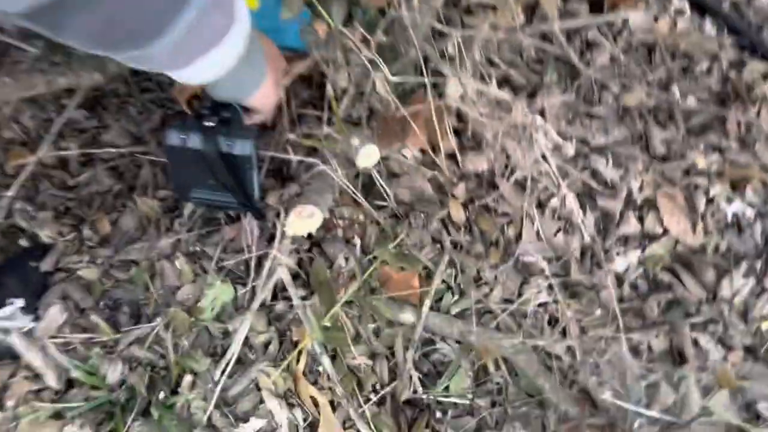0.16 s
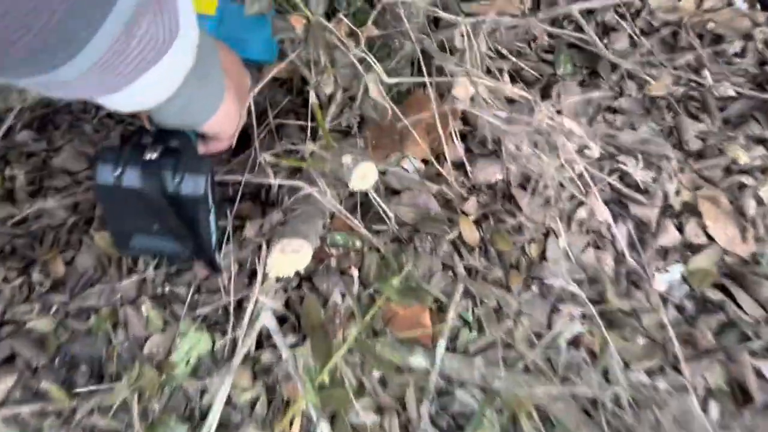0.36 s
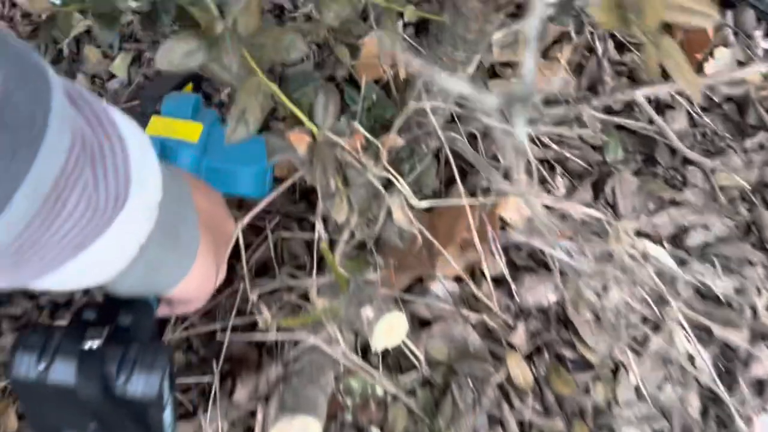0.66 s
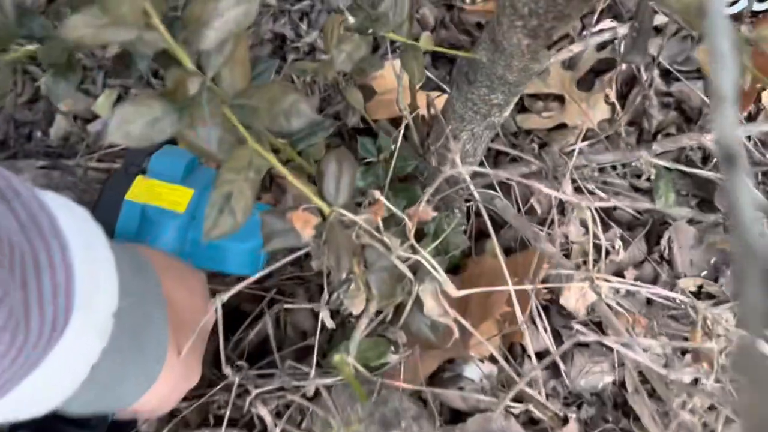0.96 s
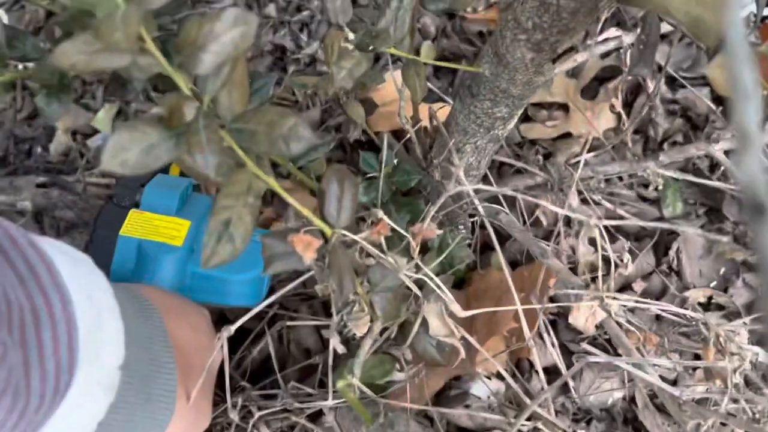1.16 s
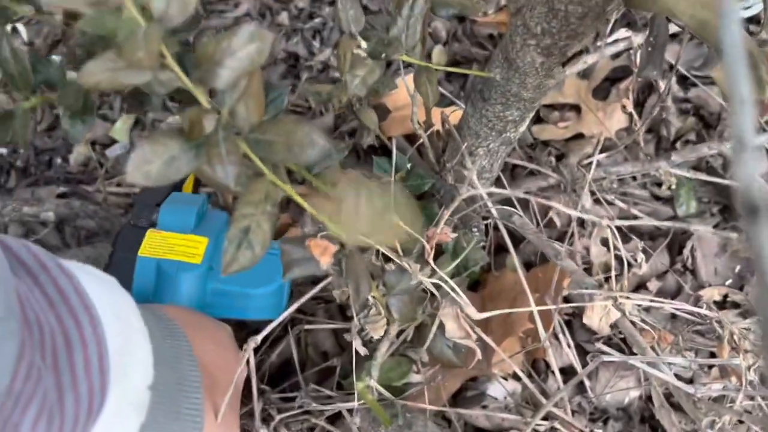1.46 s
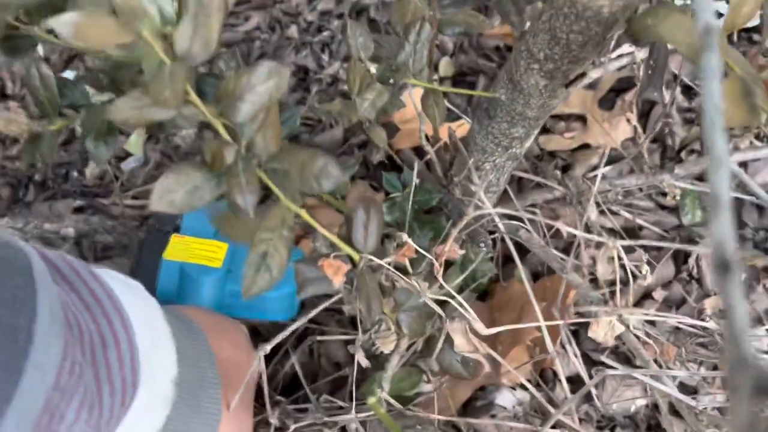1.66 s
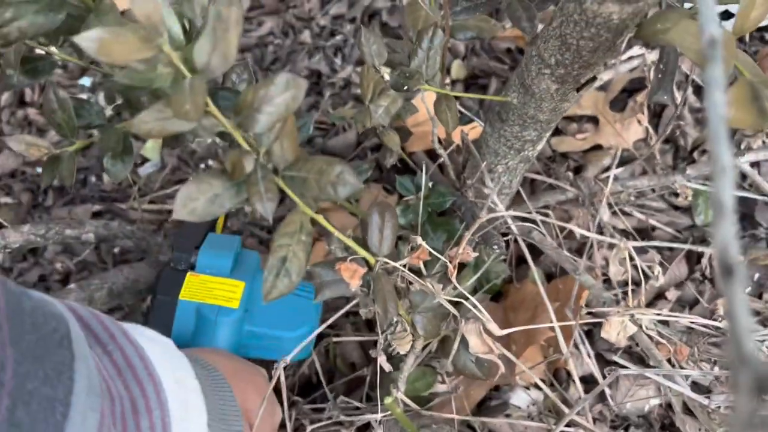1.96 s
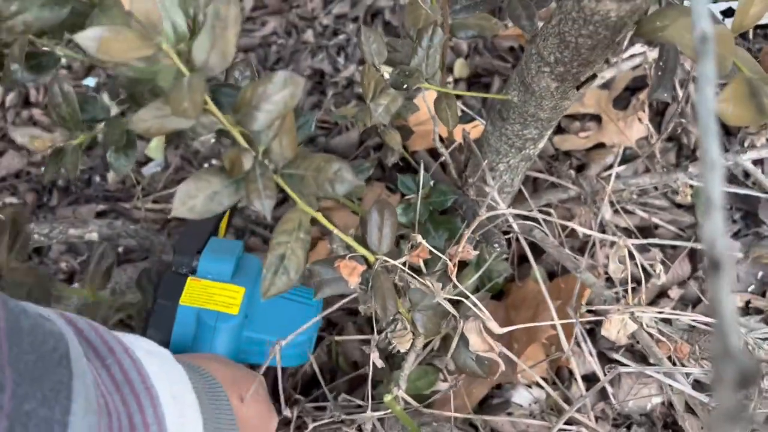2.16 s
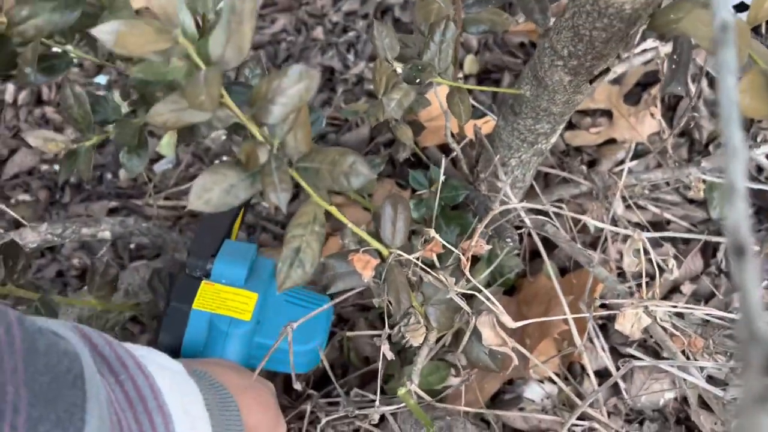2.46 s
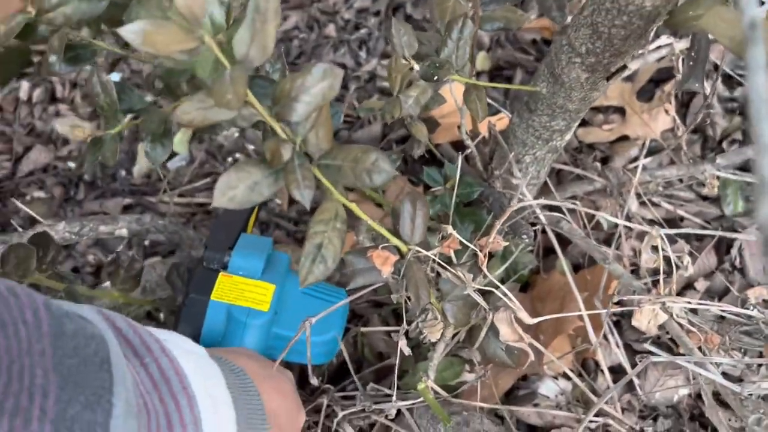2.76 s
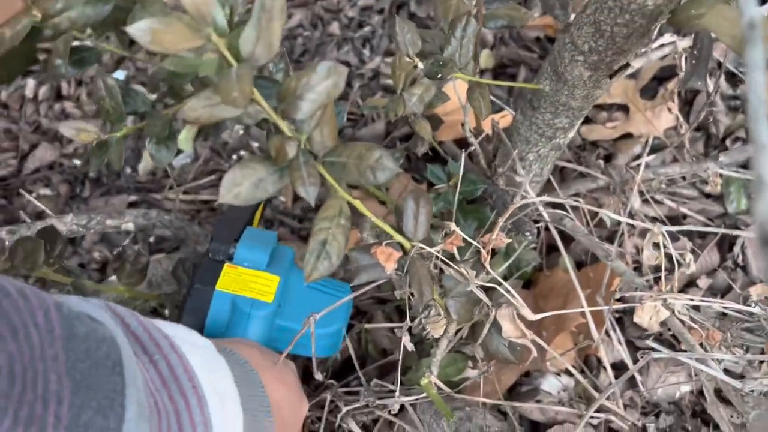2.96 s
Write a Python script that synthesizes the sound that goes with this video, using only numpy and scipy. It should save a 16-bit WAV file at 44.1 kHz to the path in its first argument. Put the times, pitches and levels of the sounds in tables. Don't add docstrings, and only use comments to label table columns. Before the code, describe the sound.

A small cordless chainsaw runs free with a steady whine and chain clatter, then bites a woody stem, chattering and tearing with sharp fibre snaps, before easing off while still running; outdoors, close phone microphone, faint wind.

```python
import sys
import numpy as np
from scipy import signal
from scipy.fft import rfft, irfft, next_fast_len
from scipy.io import wavfile
from scipy.ndimage import uniform_filter1d, map_coordinates

SR = 44100
rng = np.random.default_rng(int(sys.argv[2]) if len(sys.argv) > 2 else 0)


def ratio_of_db(decibels):
    return 10 ** (np.asarray(decibels, float) / 20)


def dump(signal):
    limited = np.clip(np.atleast_2d(signal).T, -1, 1)
    pcm = np.round(limited * 32767).astype(np.int16)
    wavfile.write(sys.argv[1], SR, pcm)


N = 136710
T = np.arange(N) / SR

# [t/s, level/dB]
CHAIN_LEVEL = [(0, -18), (.45, -16), (.6, -16.5), (.78, -16.5), (.95, -17), (1.35, -18.5), (1.6, -20),
               (1.9, -18.5), (2.27, -20.5), (2.33, -19), (2.75, -18.5), (3.1, -19)]
# [t/s, f/Hz]
SHAFT_SPEED = [(0, 464.8), (.47, 464.8), (.62, 456), (.7, 446), (.78, 424), (.9, 428), (1.1, 443),
               (1.42, 449), (1.62, 426), (1.93, 439), (2.18, 445), (2.275, 470), (2.3, 433), (2.5, 426),
               (2.79, 441.5), (2.9, 430.5), (3, 427.5), (3.1, 431)]
# [t/s, level/dB]
WHINE_LEVEL = [(0, -38), (.58, -35), (.78, -37), (.95, -31), (1.45, -31), (1.62, -37), (1.9, -37),
               (2.27, -33), (2.285, -60), (2.335, -60), (2.38, -37), (3.1, -36)]
# [f/Hz, width/Hz, level/dB]
BAR_FREE = [(830, 130, -0.5), (1128, 61, 6.5), (1645, 80, 8.5), (2210, 46, -18), (2640, 810, -3.5),
            (3030, 450, 0)]
# [f/Hz, width/Hz, level/dB]
BAR_TURNED = [(390, 37, -4.5), (544, 42, -32), (638, 12, 6.5), (1020, 14, 5), (1620, 67, -31),
              (2040, 125, 6), (2800, 1320, -1), (2910, 68, 8), (3770, 620, -19)]
# [f/Hz, width/Hz, level/dB]
HOUSING = [(4510, 230, -5), (5440, 160, 2), (6310, 880, 4), (8450, 920, 1), (11960, 860, 7.5),
           (14500, 1940, 6.5)]
# [f/Hz, level/dB]
HISS_FREE = [(180, -50), (300, -26), (545, -9.5), (1110, -12), (1630, -11.5), (1890, -1), (5740, -6.5),
             (12000, -10), (15800, -12)]
# [f/Hz, level/dB]
HISS_TURNED = [(150, -57), (250, -28), (413, -12), (1690, 1), (2080, 0), (6300, -3.5), (10600, -7.5),
               (12000, -6), (15800, -7.5)]
# [f/Hz, level/dB]
WIND_SPECTRUM = [(25, -32), (45, 0), (75, 8.5), (102, 9), (120, -5), (300, 0.5), (600, -52)]
# [t/s, level/dB]
WIND_LEVEL = [(0, -52.5), (.8, -46), (1.6, -48), (2.1, -55.5), (3.1, -59)]
# [t/s, tearing level/dB, stem thump level/dB]
BITE = [(0, -50, -70), (.4, -40, -70), (.5, -22, -55), (.62, -19, -46), (.69, -19, -35), (.82, -18, -32),
        (.95, -16, -35), (1.25, -18, -37), (1.45, -20, -37), (1.65, -22, -39), (1.85, -22, -39),
        (2.0, -23, -42), (2.15, -22, -45), (2.26, -24, -45), (2.3, -45, -64), (3.1, -45, -62)]
# [t/s, tearing level/dB, stem thump level/dB]
GRABS = [(0.469, -10, -47), (0.506, -14, -45), (0.528, -22, -42), (0.569, -23, -43), (0.598, -7, -43),
         (0.637, -13, -31), (0.683, -15, -34.0), (0.7, -14, -31), (0.734, -6, -21), (0.781, -9, -34),
         (0.855, -12, -40), (0.879, -22, -33.0), (0.896, -9.5, -20), (0.926, -17, -29.0), (0.955, -23, -30),
         (1.02, -12.1, -17), (1.036, -16, -31), (1.058, -12.5, -41), (1.083, -11, -29), (1.111, -22, -46),
         (1.151, -12.5, -44), (1.164, -14, -37), (1.228, -8, -23), (1.26, -9, -27), (1.286, -14.7, -30),
         (1.314, -15.5, -30), (1.328, -17.5, -20.5), (1.375, -11.5, -29), (1.391, -10, -29.0),
         (1.42, -7.5, -26), (1.453, -11, -23.5), (1.485, -14.9, -34.0), (1.523, -9, -24), (1.551, -20, -27),
         (1.586, -11, -32), (1.618, -8.5, -40), (1.635, -26, -39), (1.659, -20, -33), (1.678, -8.5, -24),
         (1.721, -8, -25.5), (1.762, -15.7, -30), (1.789, -7, -28), (1.818, -11, -22.5), (1.848, -22, -41),
         (1.875, -9, -31.0), (1.9, -10, -22), (1.918, -18.0, -30), (1.949, -14.5, -47), (1.986, -25, -41),
         (2.019, -20, -24), (2.073, -13.1, -28), (2.093, -18, -27), (2.142, -9.5, -25), (2.185, -20, -41),
         (2.203, -13, -25), (2.235, -30, -43.0), (2.259, -16, -37), (2.272, -22, -39.0)]
# [t/s, length/s, depth/dB]
LIFTS = [(0.762, 0.017, 10), (0.831, 0.026, 8.5), (0.877, 0.01, 4), (1.205, 0.024, 5.5), (1.276, 0.021, 3),
         (1.501, 0.012, 8), (1.537, 0.011, 7), (1.839, 0.016, 8), (1.92, 0.045, 2.5), (2.025, 0.01, 9.5),
         (2.286, .03, 1)]
# [f/Hz, level/dB]
KERF = [(120, -6), (200, -28.5), (2890, 0), (3340, -11.5), (5370, -8), (9820, -10), (14200, -11),
        (15800, -16)]
# [f/Hz, width/Hz, level/dB]
STEM = [(770, 200, -0.5), (1475, 205, 4), (3020, 600, 3), (5440, 1100, 7)]
# [f/Hz, width/Hz, level/dB]
KNOCK = [(777, 560, -5), (1610, 450, 1.5), (2400, 570, 1.5), (2915, 920, 3)]
# [f/Hz, level/dB]
THUMP = [(90, -28), (160, -7), (260, 2), (420, 6), (800, -28), (1500, -12)]
# [t/s, peak level/dB]
SNAPS = [(0.4684, -11), (0.5053, -1), (0.5916, -7), (0.5994, -7), (0.6172, 0), (0.6361, -7), (0.6821, -7),
         (0.713, -4), (0.725, -5), (0.7342, -2), (0.7806, -4), (0.7946, -8), (0.8041, -8), (0.853, -7),
         (0.8801, -8), (0.8929, -5), (0.9251, -6), (0.9379, -6), (0.9529, -7), (1.0207, -6), (1.0432, -13),
         (1.0584, -19), (1.0837, -1), (1.11, -8), (1.152, -3), (1.1616, -8), (1.1722, -8), (1.2194, -10),
         (1.234, -3), (1.2451, -6), (1.2529, -11), (1.259, -8), (1.3155, -3), (1.327, -5), (1.3747, -4),
         (1.3888, -6), (1.411, -12), (1.4195, -7), (1.451, -16), (1.486, -11), (1.516, -20), (1.6084, -10),
         (1.6747, 0), (1.6812, -6), (1.7198, -10), (1.7897, -5), (1.8185, -10), (1.875, -15), (1.8964, -12),
         (1.9503, -11), (1.9863, -13), (2.0655, -8), (2.074, -5), (2.092, -6), (2.1356, -9), (2.145, -12),
         (2.1734, -13), (2.234, -14)]
# [f/Hz, width/Hz, level/dB]
SNAP_RING = [(900, 700, -0.5), (1600, 530, 8), (2700, 1400, 8), (5500, 3000, -10)]

CHAIN_LINKS, LINKS_PER_TURN = 28, 1.1806


def unit(x):
    return x / np.sqrt(np.mean(x ** 2) + 1e-20)


def along(points, hz):
    f, db = np.transpose(points)
    return ratio_of_db(np.interp(np.log(hz + 1), np.log(f + 1), db, left=-120, right=-120))


def curves(rows):
    s, *columns = np.transpose(rows)
    return [np.interp(T, s, column) for column in columns]


def wobble(rate):
    return map_coordinates(rng.standard_normal(2000), [T * rate])


def filtered(x, response):
    size = next_fast_len(N + 8192)
    spectrum = rfft(x, size) * response(np.fft.rfftfreq(size, 1 / SR))
    return unit(irfft(spectrum, size)[:N])


def peaks(modes, f):
    total = 0
    for k, (centre, width, db) in enumerate(modes):
        damping = 1j * f * width
        total = total + (-1) ** k * ratio_of_db(db) * damping / (centre * centre - f * f + damping + 1e-9)
    return total


def humps(modes, f):
    return ratio_of_db(sum(db / (1 + (2 * (f - centre) / width) ** 2) for centre, width, db in modes))


def patchy(depth_db):
    z = signal.stft(rng.standard_normal(N + 512), nperseg=256)[2]
    field = uniform_filter1d(rng.standard_normal(z.shape), size=3, axis=0)
    field = uniform_filter1d(field, size=6, axis=1)
    return signal.istft(z * ratio_of_db(depth_db * unit(field)), nperseg=256)[1][:N]


def turned(pair):
    turn_s, turn_length_s = 1.4, 1.2
    share = np.clip((T - turn_s) / turn_length_s + .5, 0, 1)
    return pair[0] * (1 - share) + pair[1] * share


def bite_share():
    thump_db = curves(BITE)[1]
    return np.clip((thump_db + 55) / 12, 0, 1)


def lift_db():
    return -sum(db * np.exp(-(2 * (T - s) / width) ** 4) for s, width, db in LIFTS)


def lap(turns):
    first_pass_s, width_links = .0085, 1.7
    links = (turns - np.interp(first_pass_s, T, turns)) * LINKS_PER_TURN
    away = (links + CHAIN_LINKS / 2) % CHAIN_LINKS - CHAIN_LINKS / 2
    joint_db = turned((9, 2.5)) * (1 - 0.49 * bite_share())
    return links, ratio_of_db(joint_db * np.exp(-(away / width_links) ** 2 / 2))


def motor(turns, whine_db):
    bars = 12
    load = bite_share()
    shake = 2.2 * load

    def tone(order, db, roughness):
        phase = 2 * np.pi * order * turns + roughness * wobble(60)
        phase = phase + shake * (order / bars) ** 0.56 * wobble(150)
        return ratio_of_db(db + 0.44 * wobble(30.9)) * np.sqrt(2) * np.sin(phase)

    shaft = tone(0.99, turned((-43.5, -56)), 0.16)
    whine = tone(bars, whine_db, 0.083)
    mesh = tone(LINKS_PER_TURN, turned((-40, -50)), 0.05)
    octave = tone(2 * LINKS_PER_TURN, turned((-37.5, -38.5)) - 6.5 + 6 * load, 0.14)
    third = tone(3 * LINKS_PER_TURN, turned((-48, -54)) + 8.5, 0.081)
    return shaft + whine + mesh + lap(turns)[1] * (octave + third)


def chain(turns):
    links, joint = lap(turns)
    index = np.floor(4 * links).astype(int)
    hit = np.diff(index, prepend=index[0]) > 0
    pattern = rng.standard_normal(4 * CHAIN_LINKS)[index % (4 * CHAIN_LINKS)]
    size = pattern * ratio_of_db(1.5 * rng.standard_normal(N))
    strikes = unit(hit * size * joint ** .5)
    noise_share = turned((0.67, 0.65))
    drive = joint * (np.sqrt(1 - noise_share) * strikes + np.sqrt(noise_share) * patchy(depth_db=-1.0))
    clatter = turned([filtered(drive, lambda f: peaks(modes, f) * f / (f + 400))
                      for modes in (BAR_FREE, BAR_TURNED)])
    rush = joint ** 0.13 * patchy(depth_db=1.5)
    hiss = turned([filtered(rush, lambda f: along(spectrum, f) * humps(HOUSING, f))
                   for spectrum in (HISS_FREE, HISS_TURNED)])
    clatter_db = turned((-7, -7)) - 2.5 * bite_share()
    return ratio_of_db(clatter_db) * clatter + hiss


def wind():
    level_db = curves(WIND_LEVEL)[0]
    air = filtered(rng.standard_normal(N), lambda f: along(WIND_SPECTRUM, f))
    return ratio_of_db(level_db + 0.71 * wobble(4.2)) * air


def chip_ticks():
    chips_per_s, scatter_db = 900, 4
    chance = rng.random((N, 3))
    breaks = chance[:, 0] < chips_per_s / SR
    size = ratio_of_db(-scatter_db * np.log(chance[:, 2] + 0.016))
    return unit(breaks * np.sign(chance[:, 1] - .5) * size)


def grab_envelope(times, levels_db, half_s):
    return np.sqrt(sum(ratio_of_db(2 * db) * np.exp(-((T - s) / half_s) ** 2) for s, db in zip(times, levels_db)))


def cut():
    bite_db, thump_db = curves(BITE)
    grab_s, tear_db, lump_db = np.transpose(GRABS)
    grabs = grab_envelope(grab_s, tear_db, half_s=.004)
    lumps = grab_envelope(grab_s, lump_db, half_s=.007)
    force = ratio_of_db(lift_db() + 0.78 * wobble(45.7) + 1.93 * wobble(110))
    chips = chip_ticks()
    tear = filtered(patchy(depth_db=1.5), lambda f: along(KERF, f) * humps(STEM, f))
    ring = filtered(chips, lambda f: peaks(STEM[:3], f) / (1 + (f / 4500) ** 2))
    knock = filtered(grabs * (patchy(depth_db=3.5) + 0.69 * chips), lambda f: peaks(KNOCK, f))
    thump = filtered(chips + patchy(depth_db=1.0), lambda f: along(THUMP, f))
    wood = (ratio_of_db(bite_db - 1.5) + ratio_of_db(-16.5) * grabs) * (tear + ratio_of_db(-4.5) * ring)
    body = (ratio_of_db(thump_db - 4.5) + ratio_of_db(-11.5) * lumps) * thump
    return force * (wood + body) + ratio_of_db(-7.5) * np.std(grabs) * knock


def snaps():
    s, db = np.transpose(SNAPS)
    signs = np.sign(rng.random(len(s)) - .5)
    blows = np.bincount((s * SR).astype(int), ratio_of_db(db) * signs, N)
    ticks = filtered(blows, lambda f: peaks(SNAP_RING, f))
    return ratio_of_db(db.max() - 3) * ticks / np.abs(ticks).max()


def scene():
    hz, whine_db, level_db = (curves(rows)[0] for rows in (SHAFT_SPEED, WHINE_LEVEL, CHAIN_LEVEL))
    turns = np.cumsum(hz * (1 + 0.00043 * wobble(25))) / SR
    judder_db = (0.46 + bite_share()) * wobble(90)
    saw_db = level_db + .16 * lift_db() + 0.09 * wobble(13) + judder_db
    saw = ratio_of_db(saw_db) * chain(turns) + motor(turns, whine_db)
    return (saw + wind() + cut() + snaps())[None]


def top_cut(x):
    return signal.sosfilt(signal.butter(12, 16760, fs=SR, output="sos"), x)


def record(dry):
    low_hz, top_hz = 45, 15730
    soft = dry[0] / (1 + np.abs(dry[0] / .97) ** 4) ** (1 / 4)
    band = filtered(soft, lambda f: (f < top_hz) / (1 + (low_hz / (f + 1)) ** 4)) * np.std(soft)
    return top_cut(band[None])


dry = scene()
out = record(dry)
dump(out)
```